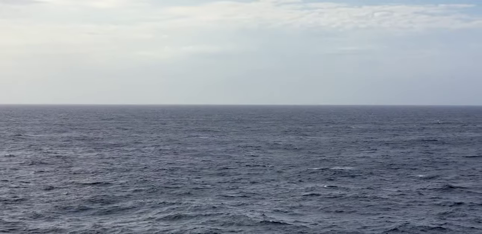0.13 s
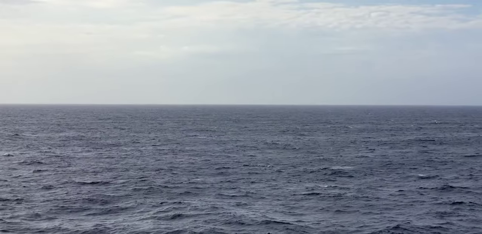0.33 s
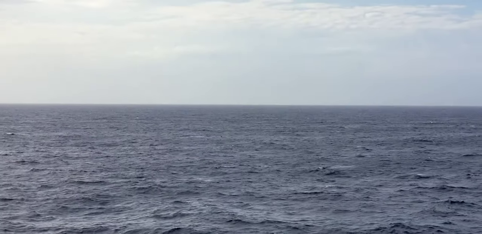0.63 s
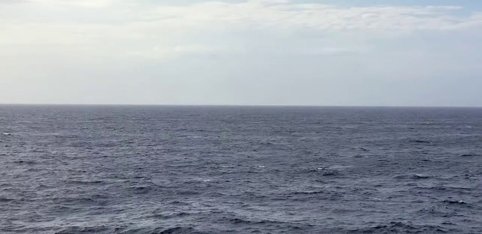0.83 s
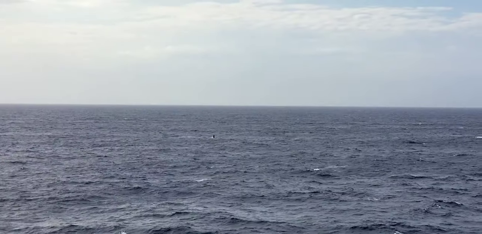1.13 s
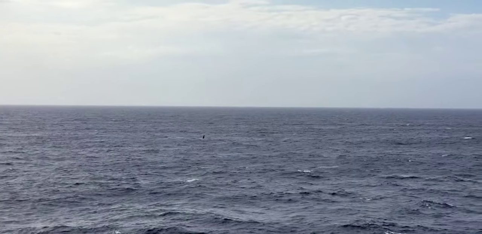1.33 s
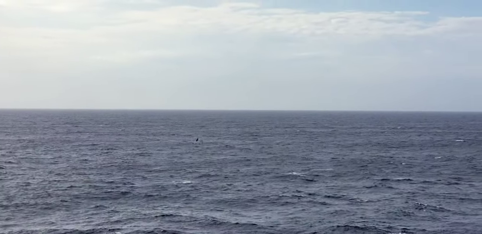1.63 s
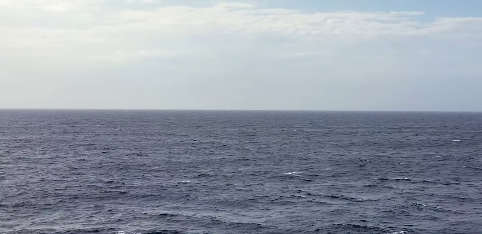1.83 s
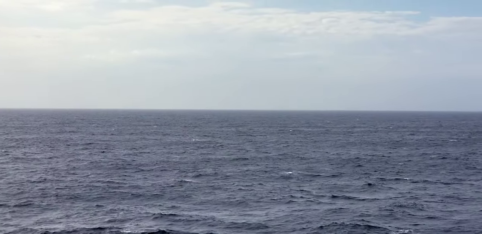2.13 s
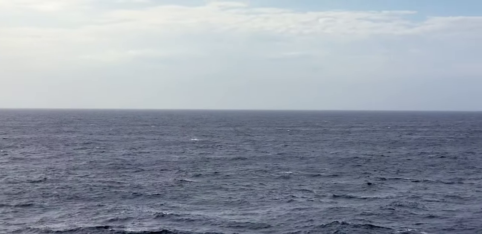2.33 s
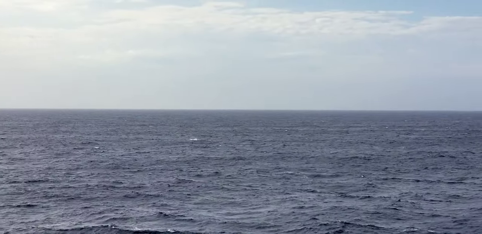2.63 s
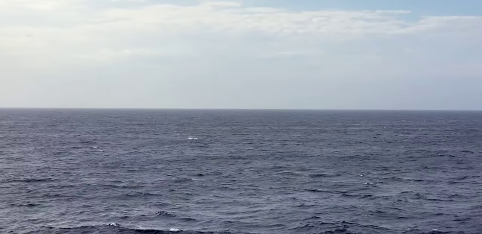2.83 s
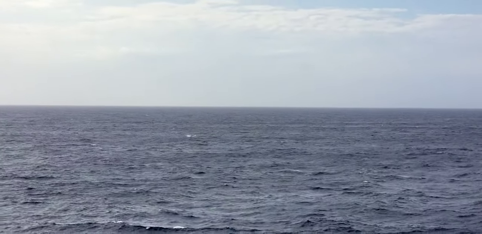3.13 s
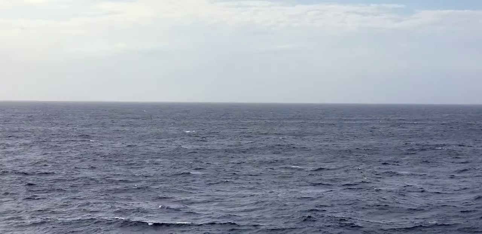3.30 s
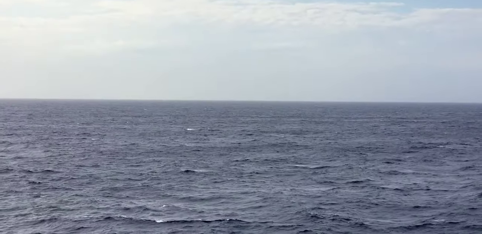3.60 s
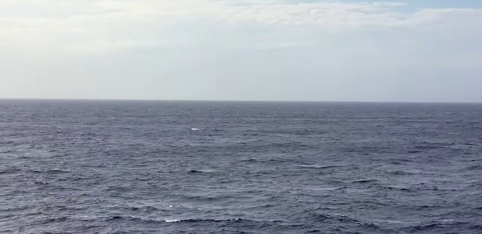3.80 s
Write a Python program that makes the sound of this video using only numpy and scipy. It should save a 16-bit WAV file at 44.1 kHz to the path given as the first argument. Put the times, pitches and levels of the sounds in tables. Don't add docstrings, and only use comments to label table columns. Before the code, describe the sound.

Wind noise starts abruptly at full strength, rumbling and thumping on the right side, softer on the left, then weakens with brief lulls; behind it, quiet sea wash and a low ship's hum outdoors.

```python
import sys
import numpy as np
from scipy import signal
from scipy.fft import rfft, irfft
from scipy.io import wavfile
from scipy.ndimage import uniform_filter1d

SR = 44100
rng = np.random.default_rng(int(sys.argv[2]) if len(sys.argv) > 2 else 0)


def voltage_ratio(level):
    return 10 ** (np.asarray(level, float) / 20)


def wrap_up_sound(samples):
    columns = np.atleast_2d(samples).T
    tamed = np.clip(columns, -1, 1)
    steps = np.round(tamed * 32767).astype(np.int16)
    wavfile.write(sys.argv[1], SR, steps)


N = 174636

# time_s, right_level_db, left_level_db
WIND_GUSTS = [(0.09, -29, -39.5), (0.32, -28.5, -37), (0.54, -30, -40), (0.77, -30, -38), (1.0, -31, -38.5),
              (1.23, -32, -38.5), (1.45, -29.0, -38), (1.68, -29, -38.0), (1.91, -30.5, -38),
              (2.13, -29, -38), (2.36, -31, -39.5), (2.59, -29, -38.5), (2.81, -30.9, -38.5),
              (3.04, -32, -40.5), (3.27, -33.7, -40), (3.5, -33.0, -39.5), (3.72, -33, -40.5),
              (3.95, -35.3, -40.5)]
# time_s, peak_db, width_ms
EDDY_HITS = [(0.1502, -16.8, 0.81), (0.2152, -17.0, 0.62), (0.2288, -16.6, 0.68), (0.3294, -15.9, 0.99),
             (0.3412, -13.3, 1.19), (0.7528, -18.3, 0.81), (1.1082, -18.9, 0.96), (1.2006, -18.8, 1.14),
             (1.4448, -14.7, 0.9), (1.5743, -17.3, 1.34), (1.6606, -16.3, 0.6), (1.8939, -16.1, 0.82),
             (1.9105, -17.1, 0.68), (2.4242, -18.8, 1.98), (2.7912, -19.1, 1.11), (3.0676, -18.1, 0.81),
             (3.0821, -16.5, 0.69), (3.1911, -20.0, 0.97), (3.2912, -20.0, 0.83), (3.3435, -20.1, 0.76),
             (3.4298, -18.9, 0.94), (3.527, -16.2, 0.81), (3.5518, -19.8, 0.89), (3.5756, -19.6, 0.97),
             (3.8744, -21.3, 0.74), (3.9433, -22.7, 0.86)]
# time_s, depth_db
WIND_LULLS = [(.57, -6), (1.05, -5), (2.25, -5), (2.58, -5), (2.84, -5), (2.97, -7), (3.047, -11),
              (3.255, -9), (3.305, -7), (3.45, -6), (3.565, -6), (3.65, -6), (3.89, -6)]
# pitch_hz, level_db (per Hz)
WIND_COLOUR_RIGHT = [(25, -35), (70, -15), (200, -1), (330, -0.5), (600, -6.5), (1100, -16), (2000, -26.5),
                     (5000, -93)]
WIND_COLOUR_LEFT = [(25, -26), (70, -2.5), (200, 1.5), (440, -0.5), (500, -2), (1100, -8), (1900, -15.5),
                    (5000, -99)]
# pitch_hz, level_db (per Hz)
WASH_COLOUR_RIGHT = [(500, -6), (1800, 2), (3300, 0), (5000, -8), (7800, -15.5), (10300, -10),
                     (12700, -13.5), (14000, -10.5)]
WASH_COLOUR_LEFT = [(1800, 5), (3500, 3), (5400, -9), (6600, -29.5), (7800, -33), (9300, -18),
                    (11000, -8.5), (13000, -14)]
WASH_LEVEL = [
    [-51.5],
    [-50],
]
# time_s, level_db
WASH_SWELL = [(.09, 1), (.3, 2), (.65, .5), (1.1, -.5), (1.35, -.5), (1.55, 1.5), (1.8, -.5), (2.2, -1),
              (2.9, -1), (3.13, 1), (3.35, -.8), (3.6, .5), (3.95, 0)]
# pitch_hz, share (1 = fully)
SWELL_SHARE = [(2000, 1), (4000, 1), (7000, 0.25), (14000, .4)]
# pitch_hz, likeness (0 to 1)
WASH_LIKENESS = [(1000, .1), (2400, .35), (4200, .35), (6000, .15), (14000, .05)]
# pitch_hz, level_db (per Hz)
HULL_COLOUR = [(20, -17), (33, -19), (45, 6), (70, 2.5), (130, -3), (300, -45)]
# pitch_hz, left_level_db, right_level_db, waver_hz
MACHINE_TONES = [(37.7, -55.5, -62, .6), (150.7, -60, -64, 1.2), (194.5, -53, -59, 2.5),
                 (363.4, -54.5, -61, 1.2), (409, -54, -61, 4), (438.7, -56, -62, 4), (563, -56, -63, 7),
                 (866.7, -62, -69, 3)]
FAINT_LIMIT = [-98.5, -92]


def evened(x):
    return x / np.sqrt(np.mean(x ** 2, -1, keepdims=True) + 1e-20)


def read(points, hz):
    table_hz, value = np.transpose(points)
    return np.interp(np.log(hz + 1), np.log(table_hz + 1), value)


def drift(top_hz, low_hz=0.):
    hz = np.fft.rfftfreq(N, 1 / SR)
    not_too_fast = 1 / (1 + (hz / top_hz) ** 4)
    not_too_slow = hz ** 2 / (hz ** 2 + low_hz ** 2 + 1e-6)
    return evened(irfft(rfft(rng.standard_normal(N)) * not_too_fast * not_too_slow, N))


def coloured(x, table):
    spectrum, hz = rfft(x), np.fft.rfftfreq(N, 1 / SR)
    own_colour = np.sqrt(uniform_filter1d(abs(spectrum) ** 2, size=301) + 1e-12)
    return evened(irfft(spectrum / own_colour * voltage_ratio(read(table, hz)), N))


def random_patches(shape, bins, frames):
    blotches = uniform_filter1d(rng.standard_normal(shape), size=bins, axis=0)
    blotches = uniform_filter1d(blotches, size=frames, axis=1)
    return blotches / blotches.std()


def wind(column, table, level_db, lump_db, flutter_db, patch_db, bend, extra_db=0):
    rows = np.array(WIND_GUSTS)
    gust_db = np.interp(np.arange(N) / SR, rows[:, 0], rows[:, column])
    wander_db = lump_db * drift(top_hz=20, low_hz=10) + flutter_db * drift(top_hz=65, low_hz=30)
    wander_db = wander_db * (1 + .16 * (gust_db.mean() - gust_db))
    soft_db = np.where(wander_db > 0, 4 * np.tanh(wander_db / 4), wander_db)
    lumps = voltage_ratio(soft_db + extra_db)
    speed = evened(drift(top_hz=442, low_hz=153) * lumps)
    speed = 3 * np.tanh(speed / 3)
    fine_hiss = 0.004 * rng.standard_normal(N) * lumps
    pressure = speed + bend * speed ** 2 + fine_hiss
    sound = patchy(coloured(pressure - pressure.mean(), table), patch_db, gust_db)
    return voltage_ratio(level_db + gust_db.mean()) * sound


def patchy(x, depth_db, gust_db):
    hz, t, z = signal.stft(x, SR, nperseg=512, noverlap=384)
    patches = random_patches(z.shape, bins=3, frames=8)
    octaves = np.clip(np.log2(hz / 300 + 1e-3), -2, 2)[:, None]
    tilt = 1 + .42 * octaves
    gust = tilt * np.interp(t, np.arange(N) / SR, gust_db - gust_db.mean())
    return signal.istft(z * voltage_ratio(depth_db * patches + gust), nperseg=512, noverlap=384)[1][:N]


def stir():
    t = np.arange(N) / SR
    stir_db, stir_s, lull_s = 1.6, .03, .009
    rough = sum(np.exp(-.5 * ((t - time_s) / stir_s) ** 2) for time_s, _, _ in EDDY_HITS)
    calm_db = sum(db * np.exp(-.5 * ((t - time_s) / lull_s) ** 2) for time_s, db in WIND_LULLS)
    return stir_db * np.minimum(rough, 1.3) + calm_db


def eddies():
    out, t = np.zeros(N), np.arange(-300, 300) / SR
    spread, period = 1.05, 3.2
    for time_s, peak_db, width_ms in EDDY_HITS:
        u = t * 1000 / width_ms
        bell = np.exp(-.5 * (u / spread) ** 2)
        push = np.cos(2 * np.pi * u / period)
        balanced = bell * (push - (push * bell).sum() / bell.sum())
        part = out[round(time_s * SR) - 300:][:600]
        part += (voltage_ratio(peak_db + .7) * balanced)[:len(part)]
    return out


def wash():
    frames, hz = N // 128 + 6, np.fft.rfftfreq(512, 1 / SR)
    a, b, c, d = rng.standard_normal((4, 257, frames))
    left, other = a + 1j * b, c + 1j * d
    same = np.clip(read(WASH_LIKENESS, hz), 0, 1)[:, None]
    right = same * left * np.exp(1j * 1.86) + np.sqrt(1 - same ** 2) * other
    z = np.array([left, right])

    rows = np.array(WASH_SWELL)
    frame_s = (np.arange(frames) - 2) * 128 / SR
    swell_db = np.interp(frame_s, rows[:, 0], rows[:, 1] - rows[:, 1].mean())
    left_top_db = (hz > 13100) * (-23 - WASH_COLOUR_LEFT[-1][1])
    colour_db = np.array([read(WASH_COLOUR_LEFT, hz) + left_top_db, read(WASH_COLOUR_RIGHT, hz)])
    foam_db = 1.5 * random_patches((257, frames), bins=12, frames=12)
    z *= voltage_ratio(colour_db[:, :, None] + foam_db + read(SWELL_SHARE, hz)[:, None] * swell_db)
    hiss = evened(signal.istft(z, nperseg=512, noverlap=384)[1][:, :N])
    return voltage_ratio(np.array(WASH_LEVEL) + .5 * drift(top_hz=25, low_hz=9.3)) * hiss


def hull():
    shared, left, right = (coloured(rng.standard_normal(N), HULL_COLOUR) for _ in range(3))
    level_db = -58.5 + 4.1 * drift(top_hz=8.7)
    return voltage_ratio(level_db) * (shared + 1.07 * np.array([left, right]))


def machinery():
    out = np.zeros((2, N))
    for hz, left_db, right_db, waver_hz in MACHINE_TONES:
        turns = np.cumsum(hz + waver_hz * drift(top_hz=4.1)) / SR + rng.random()
        tone = np.sqrt(2) * np.sin(2 * np.pi * turns) * voltage_ratio(2.1 * drift(top_hz=2.7))
        out += voltage_ratio(np.array([[left_db], [right_db]])) * tone
    return out


def scene():
    left = wind(column=2, table=WIND_COLOUR_LEFT, level_db=.57, lump_db=2.5, flutter_db=1.0,
                patch_db=1.5, bend=.04)
    right = wind(column=1, table=WIND_COLOUR_RIGHT, level_db=0, lump_db=0.3, flutter_db=2.0,
                 patch_db=1.6, bend=.13, extra_db=stir())
    push = eddies()
    calm = 1 - .7 * np.tanh(uniform_filter1d(abs(push), size=200) / .02)
    return np.array([left, calm * right + push]) + wash() + hull() + machinery()


def thinned(x):
    hz, t, z = signal.stft(x, SR, window="cosine", nperseg=2048, noverlap=1024)
    bands = (abs(z[:, :1024]) ** 2).reshape(2, 128, 8, -1).mean(2)
    loud_db = 10 * np.log10(uniform_filter1d(bands.sum(1), size=5) + 1e-12)
    rise_db = .45 * (loud_db - np.median(loud_db, 1, keepdims=True))
    floor_db = np.array(FAINT_LIMIT)[:, None] + rise_db
    keep = np.repeat(10 * np.log10(bands + 1e-20) > floor_db[:, None], 8, axis=1)
    keep = np.concatenate([keep, keep[:, :1]], 1) | (hz < 4800)[:, None]
    z = z * keep * (hz < 14540)[:, None]
    return signal.istft(z, SR, window="cosine", nperseg=2048, noverlap=1024)[1][:, :N]


def top_cut(x):
    return signal.sosfilt(signal.butter(12, 15780, fs=SR, output="sos"), x)


def record(dry):
    open_s = .0789
    opened = np.clip((np.arange(N) - open_s * SR) / 6, 0, 1)
    return top_cut(thinned(dry) * opened)


dry = scene()
out = record(dry)
wrap_up_sound(out)
```